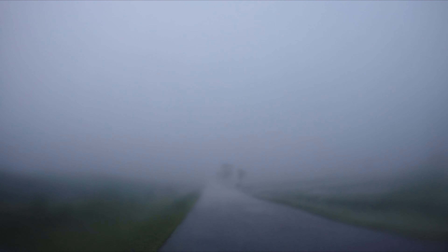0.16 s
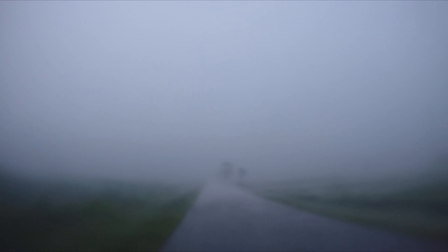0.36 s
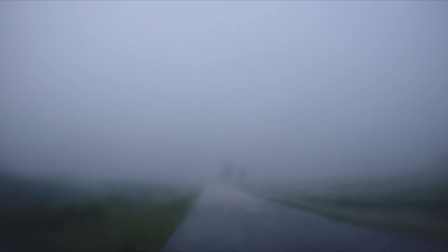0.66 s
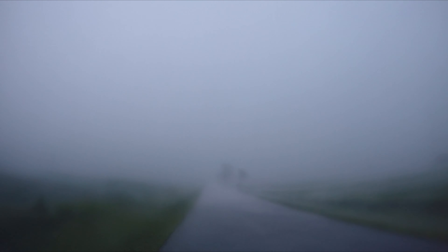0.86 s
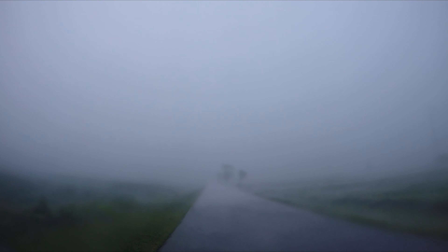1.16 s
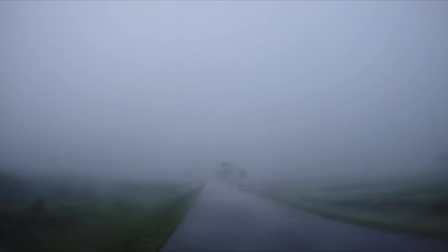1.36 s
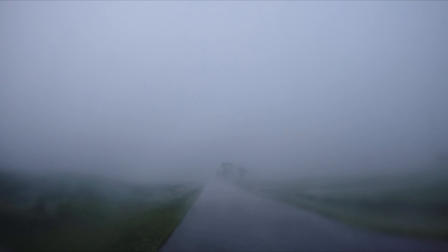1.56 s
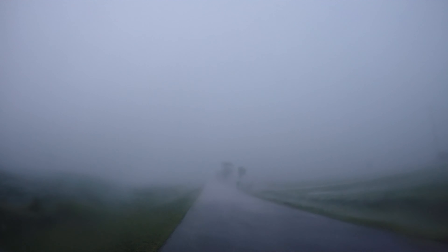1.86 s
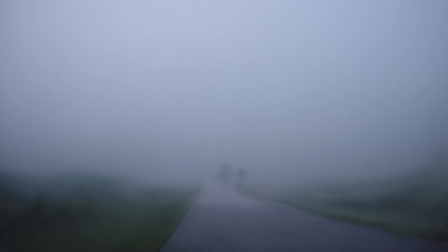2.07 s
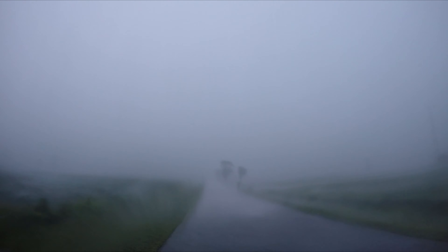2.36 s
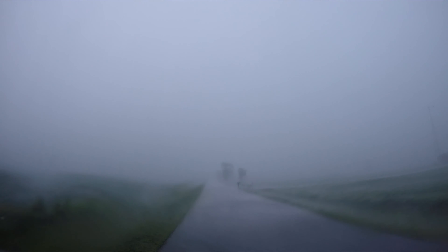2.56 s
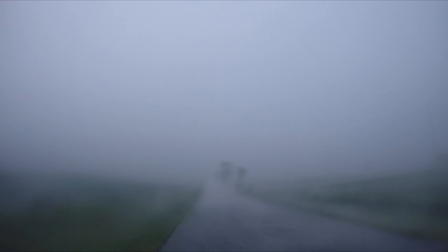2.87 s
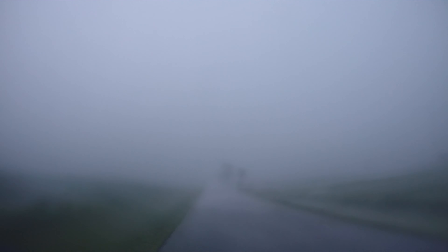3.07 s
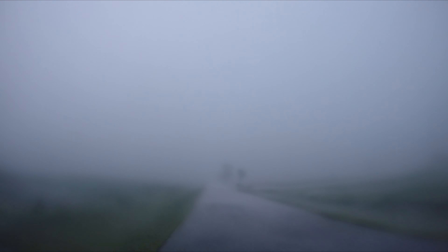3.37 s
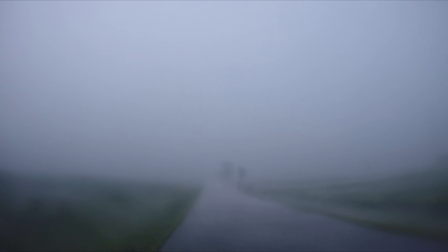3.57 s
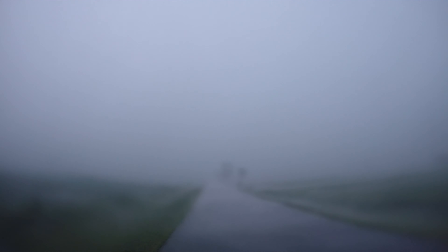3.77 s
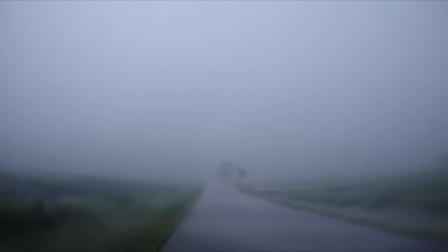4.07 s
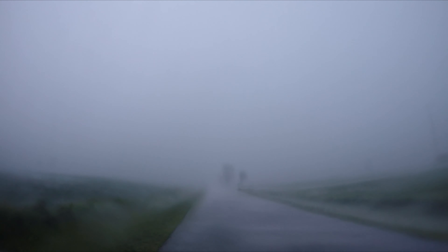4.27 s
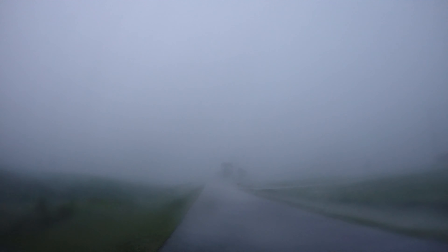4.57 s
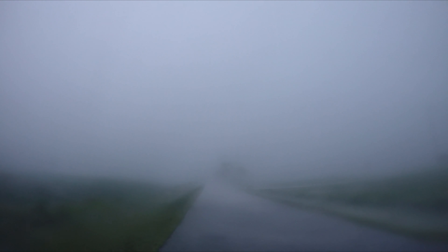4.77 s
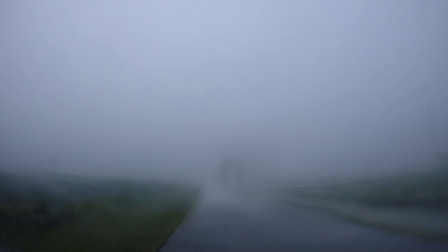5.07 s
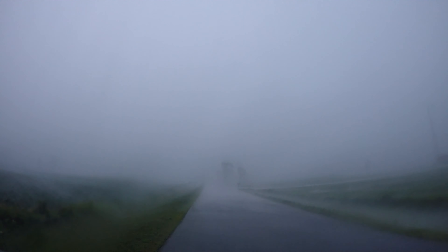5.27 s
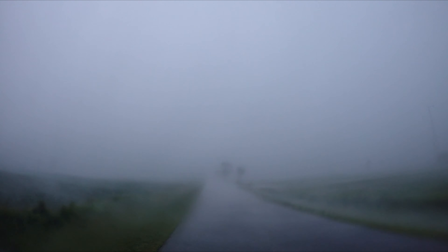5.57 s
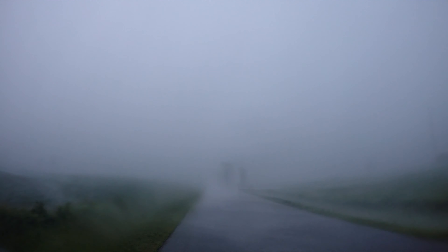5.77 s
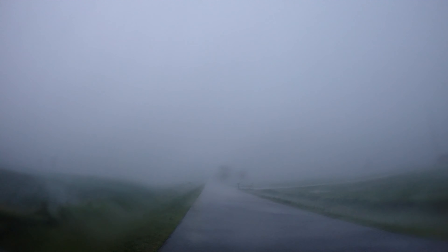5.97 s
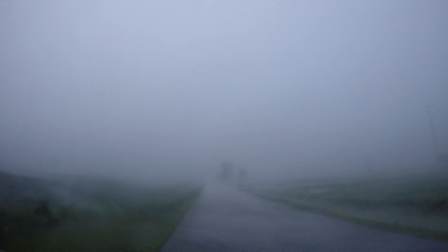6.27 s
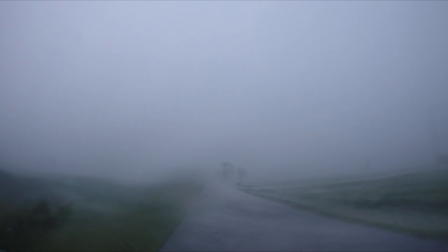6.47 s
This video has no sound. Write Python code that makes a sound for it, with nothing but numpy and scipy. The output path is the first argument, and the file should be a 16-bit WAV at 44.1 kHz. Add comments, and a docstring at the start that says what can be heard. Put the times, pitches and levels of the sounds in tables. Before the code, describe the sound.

Raindrops smack and tick sharply on a car windshield close by, over fine pattering, soft hiss and a deep wind rumble in the cabin.

```python
"""Rain on a parked car

Inside a parked car in a storm, single drops smack or tick on the windshield close to the microphone: each
one sets ringing modes going, with a low thud and a bright, noisy snap. A finer patter on the glass and
drumming and hollow knocks on the roof are struck modes too. Dense tiny bursts make the spray hiss, shaped
noise makes a smooth wash, and gusts feed noise to the cabin's low resonances, which rumble."""
import sys
import numpy as np
from scipy import signal
from scipy.fft import rfft, irfft
from scipy.io import wavfile
from scipy.ndimage import uniform_filter1d

SR = 44100
rng = np.random.default_rng(int(sys.argv[2]) if len(sys.argv) > 2 else 0)


def transcribe(signal):
    """Save signal, clipped to [-1, 1], as a 16-bit WAV file at the path in sys.argv[1]."""
    frames = np.atleast_2d(signal).T
    limited = np.clip(frames, -1, 1)
    pcm = np.round(limited * 32767).astype(np.int16)
    wavfile.write(sys.argv[1], SR, pcm)


def level_to_linear(level):
    """Convert decibel levels to linear amplitude factors, elementwise."""
    exponent = np.asarray(level, float) / 20
    return 10 ** exponent


N = 292383   # length in samples


def rms_one(x):
    """Scales to unit rms, so that a level can be set afterwards."""
    return x / np.sqrt(np.mean(x ** 2) + 1e-20)


def in_time(rows):
    """Draws each column after the time column as a curve over the samples."""
    start_s, *columns = np.transpose(rows)
    return [np.interp(np.arange(N) / SR, start_s, column) for column in columns]


def drift(rate_hz):
    """Slow random wandering of unit rms: noise smoothed by two equal poles, one point per 40 samples."""
    pole = np.exp(-80 * np.pi * rate_hz / SR)
    noise = rng.standard_normal(N // 40 + 2002)
    slow = signal.lfilter([1], [1, -2 * pole, pole * pole], noise)[2000:]   # skip the filter's start
    return np.interp(np.arange(N) / 40, np.arange(len(slow)), rms_one(slow))


def colour(x, spectrum):
    """Shapes x by a spectrum, with minimum phase so that nothing sounds early; white rms is kept."""
    pitch_hz, level_db = np.transpose(spectrum)
    grid_hz = np.linspace(1, SR / 2, 2049)
    cepstrum = irfft(np.log(level_to_linear(np.interp(np.log(grid_hz), np.log(pitch_hz), level_db))))
    # folding the cepstrum onto its first half gives minimum phase
    cepstrum[1:2048] *= 2
    cepstrum[2049:] = 0
    kernel = irfft(np.exp(rfft(cepstrum)))
    return signal.fftconvolve(x, kernel / np.sqrt(np.sum(kernel ** 2)))[:N]


def ring(force, pitch_hz, t60_s):
    """One damped mode, falling 60 dB in t60_s; a unit click leaves unit energy."""
    r = level_to_linear(-60 / (t60_s * SR))
    w = 2 * np.pi * pitch_hz / SR
    gain = np.sin(w) * np.sqrt(2 * (1 - r * r))
    return signal.lfilter([0, gain], [1, -2 * r * np.cos(w), r * r], force + 1e-18)


def splat(at, sizes, spread_s, clean):
    """Each drop pushes with a clean tick, then flattens in a burst of noise; unit energy for size 1."""
    clicks = np.bincount(at, sizes, N)[:N]
    r = np.exp(-1 / (spread_s * SR))
    fade = signal.lfilter([0, np.sqrt(1 - r * r)], [1, -r], clicks + 1e-18)
    burst = fade * rng.standard_normal(N)
    return np.sqrt(clean) * clicks + np.sqrt(1 - clean) * burst


def strike(modes, at, sizes, shares_db, spread_s, clean):
    """Deals each drop's energy to the modes; stiff panels radiate little below their lowest mode."""
    shares = level_to_linear(shares_db + np.array(modes)[:, 1])
    shares = shares / np.sqrt(np.sum(shares ** 2, axis=1, keepdims=True))
    rung = 0
    for k, (pitch_hz, _, t60_s) in enumerate(modes):
        force = splat(at, sizes * shares[:, k], spread_s, clean)
        rung = rung + (-1) ** k * ring(force, pitch_hz, t60_s)   # neighbours alternate in sign
    low_cut = signal.butter(3, 0.67 * modes[0][0], "high", fs=SR, output="sos")
    return signal.sosfilt(low_cut, rung)


def small_drops(per_s, size_db):
    """Random landing times in clumps, with many small drops and few large ones."""
    at = np.flatnonzero(rng.random(N) < per_s * level_to_linear(3.0 * drift(15)) / SR)
    return at, level_to_linear(size_db * np.minimum(rng.exponential(1, len(at)), 3.5))


# What glass and dashboard ring with; the single drops strike these modes too.
# Columns: pitch_hz, level_db (relative), t60_s
GLASS_MODES = [(1478, -2, 0.0078), (1640, 0.5, 0.01), (1830, -2.5, 0.014), (2079, -1, 0.012),
               (2300, -8, 0.038), (2630, -0.5, 0.011), (3182, -4, 0.011), (4200, -2.5, 0.0078),
               (4526, -5.5, 0.006), (4780, -2.5, 0.0082), (4950, -5, 0.0069)]
# Colour of the snap of a drop on glass. Columns: pitch_hz, level_db (relative, per Hz)
SNAP_COLOUR = [(100, -10), (300, -4.5), (520, -22), (900, -27.5), (3000, -1.5), (5500, 3.5), (6300, -3.5),
               (7000, 2.5), (8300, -7.5), (10000, -10.5), (14800, -14.5), (16000, -33)]


def patter(level_db):
    """Small drops all over the glass, each with its own mix of modes and a faint snap."""
    at, sizes = small_drops(400, size_db=9.0)
    mix_db = 8.0 * rng.standard_normal((len(at), len(GLASS_MODES)))
    glass = strike(GLASS_MODES, at, sizes, mix_db, spread_s=0.0005, clean=0.69)
    snap = colour(splat(at, sizes * level_to_linear(-9.5), spread_s=0.0004, clean=0.73), SNAP_COLOUR)
    return level_to_linear(level_db) * rms_one(glass + snap)


# The low, longer ringing modes of the roof; its knocks use them too.
# Columns: pitch_hz, level_db (relative), t60_s
ROOF_MODES = [(725, -14.5, 0.061), (846, -1, 0.064), (1056, 4.5, 0.054), (1160, -9.5, 0.072)]


def roof_drumming(level_db):
    """Duller drops overhead push slowly and reach only the low, longer ringing modes."""
    at, sizes = small_drops(600, size_db=4.5)
    mix_db = 5.9 * rng.standard_normal((len(at), len(ROOF_MODES)))
    drum = strike(ROOF_MODES, at, sizes, mix_db, spread_s=0.0029, clean=0.13)
    return level_to_linear(level_db) * rms_one(drum)


# Colour of the spray's hiss. Columns: pitch_hz, level_db (relative, per Hz)
SPRAY_COLOUR = [(88, -43.5), (150, -4), (524, -37), (675, 4.5), (1060, 0), (1310, -1), (2020, 8),
                (2700, 2.5), (3620, -3.5), (4760, 1.5), (6260, -15), (7180, -7), (13700, -13), (15100, -28),
                (16000, -49)]


def spray(level_db):
    """The finest drops burst so densely that they nearly merge into a hiss."""
    at, sizes = small_drops(700, size_db=6.0)
    bursts = splat(at, sizes, spread_s=0.0013, clean=0.1)
    return level_to_linear(level_db) * colour(rms_one(bursts), SPRAY_COLOUR)


# How loud the wash is over time. Columns: start_s, level_db
WASH_LEVEL = [(0.0, -40), (0.64, -51), (1.3, -39.5), (2.3, -45), (3.3, -47), (3.86, -45), (4.1, -37.5),
              (4.3, -34), (4.6, -37), (5.0, -43), (5.3, -56), (5.78, -46), (5.96, -43.5), (6.15, -35.5),
              (6.39, -33), (6.63, -38)]
# Its colour. Columns: pitch_hz, level_db (relative, per Hz)
WASH_SPECTRUM = [(300, -38), (560, -36), (720, -10.5), (1040, 0.5), (1280, -9.5), (1600, -4.5), (2060, 0.5),
                 (2350, -3), (2650, -5.5), (2850, -19), (3800, -20), (4900, -14), (6300, -26),
                 (15000, -30.5)]


def wash():
    """Rain on the whole body merges into smooth noise that swells slowly."""
    level_db, = in_time(WASH_LEVEL)
    noise = colour(rng.standard_normal(N), WASH_SPECTRUM)
    return level_to_linear(level_db + 0.89 * drift(8.0)) * noise


# How loud the gusts' rumble is over time. Columns: start_s, level_db
GUST_LEVEL = [(0.0, -33.5), (0.16, -39), (0.2, -43), (0.7, -41.5), (1.5, -41), (1.57, -37.5), (2.33, -41.5),
              (2.51, -37), (3.03, -40.5), (3.3, -39.5), (3.53, -41.5), (3.78, -39.5), (4.26, -36.5),
              (4.36, -31.5), (4.54, -34), (4.63, -29.5), (4.86, -37.5), (5.11, -32.5), (5.24, -45),
              (5.39, -38), (5.83, -43.5), (5.95, -40.5), (6.08, -44.5), (6.15, -36), (6.39, -32),
              (6.63, -33.5)]
# Cabin and body resonances shaken by gusts. Columns: pitch_hz, width_hz, level_db (relative, per Hz)
CABIN_MODES = [(25.5, 9.6, -7.5), (33.72, 1.5, 7.5), (57.4, 4.65, 0.5), (83, 5.2, -4), (130, 8.8, -15),
               (190, 54, -59), (306, 11.6, -20)]
EVEN_S, EVEN_SHARE = 0.16, 0.4   # chance swells are partly evened over this time (s), by this share


def wind():
    """Turbulence feeds the low resonances, each swelling on its own."""
    rumble = 0
    for pitch_hz, width_hz, mode_db in CABIN_MODES:
        t60_s = 3 * np.log(10) / (np.pi * width_hz)   # a narrower resonance rings longer
        mode = ring(rng.standard_normal(N), pitch_hz, t60_s)
        mode = rms_one(np.diff(mode, prepend=0))
        rumble = rumble + level_to_linear(mode_db + 1.8 * drift(2.1)) * np.sqrt(width_hz) * mode
    swell = uniform_filter1d(rumble ** 2, int(EVEN_S * SR)) + 1e-12
    level_db, = in_time(GUST_LEVEL)
    return level_to_linear(level_db) * rms_one(rumble / swell ** (EVEN_SHARE / 2))


# The largest middling drops stand this far (dB) over the patter; the spread (dB) sets how fast sizes fall.
MIDDLING_PER_S, MIDDLING_OVER_PATTER_DB, MIDDLING_SPREAD_DB = 25, 11, 4.5
MIDDLING_SNAP_DB, SNAP_SPREAD_DB = -7, 4   # relative to the ring
# The thud relative to the ring: weaker where the glass rings high
THUD_DB, THUD_DB_PER_OCTAVE, THUD_SPREAD_DB = -13.5, -3, 2


def middling_drops(patter_db):
    """Rows like those of the timed drops, by chance: any time, any mode, sized with the patter."""
    when, size, mode, snap, thud = rng.random((int(MIDDLING_PER_S * N / SR), 5)).T
    ring_db = patter_db[(when * N).astype(int)] + MIDDLING_OVER_PATTER_DB
    ring_db = ring_db + MIDDLING_SPREAD_DB * np.log(size + 1e-9)
    pitch_hz = np.array(GLASS_MODES)[(mode * len(GLASS_MODES)).astype(int), 0]
    # sqrt(3) * (2u - 1) is an even chance of spread 1
    snap_db = MIDDLING_SNAP_DB + SNAP_SPREAD_DB * np.sqrt(3) * (2 * snap - 1)
    octaves_up = np.log2(pitch_hz / GLASS_MODES[3][0])
    thud_db = THUD_DB + THUD_DB_PER_OCTAVE * octaves_up + THUD_SPREAD_DB * np.sqrt(3) * (2 * thud - 1)
    return np.transpose([when * N / SR, ring_db, pitch_hz, snap_db, thud_db])


# Drops at set times, from loud smacks to faint ticks. Columns: start_s, ring_db (over the first 6 ms),
# pitch_hz (strongest ring), snap_db (relative to the ring), thud_db (relative to the ring)
TIMED_DROPS = [(0.0676, -24, 2080, -15, -20), (0.0718, -19.5, 2630, -18, -13),
               (0.0769, -21.5, 1640, -18, -6.5), (0.1149, -11, 2710, -19, -23),
               (0.1332, -25, 2070, -27, -1), (0.1477, -17.5, 2270, -15, -7),
               (0.1812, -19.5, 4370, -20, -23), (0.1904, -25, 1650, -18.0, -13),
               (0.1956, -17.5, 4590, -12.5, -20), (0.2062, -45, 4980, -18, -19.0),
               (0.2174, -20.5, 4210, -11.0, -9), (0.2273, -18.5, 1480, -22.0, -9),
               (0.2402, -15, 4200, -18, -14), (0.2576, -15, 2070, -12, -14), (0.2632, -11, 2050, -32, -8.5),
               (0.2717, -22, 2380, -25, -21), (0.2769, -31, 1850, -26, -11), (0.2855, -19, 4080, -21, -21),
               (0.3088, -18.5, 4600, -10, -15), (0.3365, -24.5, 4790, -6, -12.0),
               (0.3571, -18, 1524, -19.0, -5), (0.3634, -29, 3170, -16, -6),
               (0.3822, -28.5, 2080, 3, -14.0), (0.3903, -30, 2760, -11.0, -15.0),
               (0.4083, -15.5, 1890, -9.5, -12), (0.4246, -36, 2440, -15.0, -17.0),
               (0.4288, -21.5, 2150, -25.0, -8), (0.4414, -30, 2030, -4, -6),
               (0.4704, -13.5, 1930, -18, -10), (0.4908, -25, 2570, -1, -25), (0.4973, -35, 4830, -7, -24),
               (0.5234, -24, 4930, -3, -29), (0.5312, -34, 4820, 3, -16), (0.5468, -28, 4740, -9, -14.0),
               (0.5525, -12.5, 4170, -9.5, -32), (0.5847, -17.5, 2620, -10.0, -13),
               (0.598, -30, 1520, -13.0, -2), (0.6089, -19.5, 2630, -14, -11),
               (0.6182, -21, 2150, -26, -18), (0.6397, -19.5, 2210, -20, -14), (0.6664, -25, 1480, -10, -5),
               (0.6865, -26, 2070, -13, -2), (0.6963, -23.5, 4680, -14, -13),
               (0.7152, -23.5, 1600, -18, -8), (0.7214, -28.5, 2100, -17, -15),
               (0.7408, -13, 2720, -13, -30), (0.7737, -12.5, 1925, -12, -9.5),
               (0.7918, -23, 4380, -6, -10), (0.7963, -11, 4200, -14, -9.5), (0.8704, -27, 1650, -28, -11),
               (0.8864, -26, 4790, -12, -9), (0.9202, -16.5, 1930, -30, -9.5),
               (0.9391, -20.5, 2170, -18, -13), (0.9681, -20.5, 1940, -13.5, -5.5),
               (1.0032, -31, 2050, -3, -18), (1.0221, -12, 4200, -36, -21),
               (1.0578, -23.5, 1950, -13.0, -5), (1.0782, -37, 2050, -16, -20),
               (1.0918, -32, 4200, -12, -26), (1.1095, -48, 2300, -9, -14), (1.1408, -21, 2020, -10, -9),
               (1.1432, -24, 4250, -19, -20), (1.1481, -25, 4220, -16, -16), (1.1801, -24, 4210, -11, -15),
               (1.1863, -21.5, 1830, -16, -7), (1.2279, -33.5, 1650, -18, 2),
               (1.2374, -16.5, 1610, -31, -13), (1.2456, -18.5, 2630, -16, -10),
               (1.2611, -21, 1600, -14.5, -9), (1.2745, -26, 2760, -17, -15), (1.3049, -22, 4130, -16, -18),
               (1.3151, -28, 4670, -13, -15), (1.3195, -19.5, 2210, -17.0, -30),
               (1.3694, -23, 4760, -14, -14), (1.4165, -17.5, 1930, -17.0, -13),
               (1.4427, -28.5, 2540, -2.5, -19), (1.4572, -28, 1400, -20, -5), (1.4749, -30, 5030, -1, -12),
               (1.482, -21, 2640, -19, -12), (1.4993, -29, 2080, -18, -11), (1.5358, -29, 2130, -20, -15),
               (1.5708, -40, 4270, 2, -13), (1.5753, -26, 1920, -16, -17.0),
               (1.5858, -22.5, 4910, -10, -21), (1.6171, -11.5, 2030, -20, -6.5),
               (1.6353, -34.5, 1870, -7, 10), (1.6391, -18.5, 1750, -14, -13),
               (1.7807, -17.5, 4380, -9, -25), (1.7972, -20.5, 2060, -18, -13),
               (1.8282, -18, 5000, -2.5, -13), (1.8901, -26, 3060, -24, -29),
               (1.9094, -9.5, 1890, -16.0, -15), (1.9159, -23.5, 1800, -11, 0),
               (1.9301, -14.5, 1900, -20, -12), (1.9753, -29, 2680, -14.0, -12),
               (1.9901, -27, 4460, -4, -2), (1.9989, -23, 4850, -5.5, -21), (2.0066, -28, 2260, -3, -7.0),
               (2.0123, -25, 2480, -10, -14.0), (2.0212, -24.5, 1380, -12, -9.0),
               (2.0757, -29, 2800, -21, -18), (2.085, -20, 4330, -13, -4), (2.1054, -17, 1520, -12, -7),
               (2.1128, -22.5, 1560, -15, -8), (2.1294, -20.5, 2140, -13, -8),
               (2.1604, -19.5, 4300, -9, -13), (2.174, -27, 2420, -8.0, -12), (2.189, -20, 2600, -12, -14),
               (2.2122, -11, 4200, -20, -20), (2.2155, -25, 1860, -29, 0), (2.2711, -29.0, 2210, -22, -1),
               (2.284, -22, 1470, -29, -6), (2.33, -21, 2030, -37, -7), (2.3684, -21.5, 2700, -10, -11),
               (2.3805, -38, 3250, -17, -10), (2.3855, -24, 2650, -7.5, -5), (2.4295, -28, 4200, -7, -22),
               (2.4877, -23, 2710, -7.5, -16), (2.5244, -19, 4200, -30, -37), (2.5361, -26, 1820, -6, -9),
               (2.5707, -12.5, 1610, -13, -13), (2.5942, -13.5, 2016, -10, -23),
               (2.6051, -26, 4100, -7, -19.0), (2.6324, -26, 1970, -5.5, -9), (2.7033, -16, 4190, -13, -30),
               (2.7362, -26, 1900, -14.0, -1), (2.7419, -28, 2010, -24, -20),
               (2.7555, -18.5, 2630, -3.5, -21), (2.8265, -34, 1830, -23, -19),
               (2.8324, -17, 4200, -15, -21), (2.8403, -10.5, 2600, -14, -31),
               (2.8493, -26, 4550, -0.5, -11), (2.8546, -17.5, 1530, -21, -15),
               (2.8761, -22.5, 2760, -10, -29.0), (2.8821, -17.5, 2030, -26, -13),
               (2.8912, -18.5, 1510, -22, -9.5), (2.9008, -18, 4800, -5, -11), (2.906, -19, 1660, -26, -2),
               (2.9198, -21, 2090, -16.0, -12), (2.9236, -19.5, 1970, -1.5, -18),
               (2.944, -31, 1750, -8, -15), (2.95, -33, 4900, -1, -24.0), (2.9555, -15, 4330, -11, -25),
               (2.9869, -21, 2030, -15, -4.5), (3.0452, -19.5, 2610, -19.0, -10),
               (3.0561, -31, 1710, -28.0, -2), (3.0601, -28, 1770, -15, -2),
               (3.0788, -27, 2050, -10.0, -18), (3.0873, -11, 4900, -14, -18),
               (3.0906, -15.5, 2185, -8.5, -21), (3.1154, -25, 4920, -6, -19),
               (3.1193, -29, 2060, -8, -18.0), (3.1465, -17.5, 4200, -7, -32), (3.1508, -20, 1900, -7, -10),
               (3.1583, -20.5, 1820, -20, -10), (3.1691, -27, 2020, -19, -18), (3.1832, -23, 4280, -9, -15),
               (3.1912, -29, 2450, -13, -4), (3.1991, -30, 4200, -20, -31), (3.2206, -29, 4200, -6, -22),
               (3.2506, -27, 2110, -21, -1), (3.2548, -26, 1550, -5, -14), (3.274, -15.0, 2700, -16, -11),
               (3.2897, -25.0, 3210, -20.0, -8), (3.3115, -29, 4500, -8, -7),
               (3.3177, -31, 4330, -14, -26.0), (3.3222, -28, 2080, -4, -2), (3.3325, -30, 4870, 6.5, -10),
               (3.3381, -30, 4780, 3, -23), (3.3417, -42, 5080, -1, -9), (3.3473, -30, 2100, -11.0, -5),
               (3.3566, -26, 2080, -12, -11), (3.362, -32, 4930, -5.0, -1),
               (3.3683, -23.5, 1930, -18.0, -6.5), (3.3738, -24, 1760, -24, -14),
               (3.3817, -25, 2270, -10, -20), (3.3906, -29, 2200, -12.0, -2),
               (3.3988, -25, 2300, -17, -13.0), (3.4046, -17.5, 1830, -11, -9),
               (3.4134, -24, 2270, -11, -23), (3.4265, -20, 1640, -30, -8.5),
               (3.4489, -33, 2090, -1.0, -12), (3.4672, -18, 2060, -21, -9),
               (3.5126, -16, 4170, -26, -11.5), (3.5202, -25, 2050, -2.5, -23),
               (3.5316, -18.5, 4200, -17.0, -19), (3.5407, -23, 1990, -14, -13.0),
               (3.567, -32, 1930, -20, -19), (3.6344, -19.5, 2330, -12, -12),
               (3.6483, -20.5, 2590, -13, -9), (3.6672, -11.5, 4200, -21, -31),
               (3.6998, -20, 2050, -18.0, -19), (3.7113, -15.5, 1600, -7.5, -9),
               (3.7316, -12, 2010, -20, -13.5), (3.7546, -30, 1880, -15.0, -1),
               (3.7763, -42, 4110, -12, -9), (3.7943, -21.5, 4200, -2.5, -25),
               (3.7959, -20, 4200, -24, -7.5), (3.8104, -25, 4200, -12, -8.0), (3.8177, -30, 1830, -15, 1),
               (3.8295, -26, 2050, -17, -14), (3.8413, -28.5, 1730, -8, -4),
               (3.8563, -31.5, 2400, -8, -22.0), (3.8863, -33, 2020, -14, 0), (3.9596, -44, 2120, 0, -12),
               (4.0206, -27, 1500, -8.5, -14), (4.0463, -21, 1710, -16, -16), (4.0849, -36, 2060, -3.5, 4),
               (4.1993, -30.5, 5000, -19, -23), (4.2037, -31, 1970, -14, -5),
               (4.2187, -22, 2040, -26, -11.0), (4.2486, -38, 1650, -26, -16), (4.3063, -30, 4830, 1, 0),
               (4.3504, -29, 2150, -19.0, -28.0), (4.3556, -24, 1930, -9, -18),
               (4.3682, -13.5, 2450, -9.5, -26), (4.3835, -25.5, 4760, 1, -26),
               (4.3953, -19, 2040, -17, -2), (4.4105, -20, 1630, -17, -11), (4.4141, -27, 4700, 0, -10),
               (4.4193, -26, 1950, -19, -2), (4.4593, -14, 4660, -14, -8), (4.4716, -29.5, 4400, -1, -15.0),
               (4.4859, -30, 1530, -19, -16), (4.4985, -31.0, 2100, 1, 3.5), (4.5244, -22, 4970, -14, -13),
               (4.5369, -24, 4120, -15, -28.0), (4.5541, -15.5, 2120, -13.5, -13),
               (4.5644, -24, 2060, -10, -5), (4.5731, -33, 3100, -15, 1), (4.6012, -15, 4870, -1, -28),
               (4.6096, -21.5, 1920, -32, -1), (4.6204, -15, 4240, -22, -9),
               (4.6347, -15.5, 1830, -7, -4.5), (4.6658, -20.5, 2160, -9, -22),
               (4.6765, -21, 1690, -15.0, -8), (4.7016, -25, 2350, -12, -14), (4.7216, -26, 2650, -2, -2),
               (4.7377, -27, 4330, 1, -22), (4.7642, -16.5, 4530, -9.5, -14), (4.7753, -24, 4480, -9, -5),
               (4.7868, -24.0, 4610, -12, -13.0), (4.7924, -22, 1800, -4, -6), (4.8116, -23, 1900, -4, -21),
               (4.844, -18.5, 4400, -10, -22), (4.8505, -21.5, 4610, -8, -23),
               (4.8577, -27.0, 2110, -21, -27.0), (4.8677, -32, 2430, -14, -14),
               (4.8765, -30.0, 2120, -9, -14), (4.8946, -17, 4670, -1.5, -22),
               (4.9048, -34, 2030, -9, -21.0), (4.9117, -27, 4530, -8, -4), (4.9166, -27, 4750, -7, -27.0),
               (4.9415, -10.5, 2230, -14.5, -8.5), (4.9475, -21, 4400, -11, 2),
               (4.9575, -23, 2070, -24.0, -17), (4.98, -20, 3480, -9, -2.0),
               (5.0049, -32, 2030, -16, -12.0), (5.0107, -23.5, 2010, -23, -6),
               (5.029, -26, 1930, -18, -18.0), (5.0732, -37, 4330, 5, -1), (5.0907, -18, 2070, -11, -6),
               (5.1112, -26, 4710, -6, -3), (5.1163, -20, 3220, -8, -10), (5.13, -20, 1595, -10, -6),
               (5.151, -22, 4770, -9.0, -2.5), (5.1606, -6.5, 2630, -4, -24), (5.1978, -41, 4800, -6, -20),
               (5.2105, -37, 1640, -4, -10), (5.2272, -32, 4660, -12, -12), (5.235, -29, 1710, -8, -14),
               (5.2456, -28, 1960, -13, -9), (5.2636, -35, 4200, -9, -22), (5.321, -36, 2010, -4, -16),
               (5.3308, -30, 2030, -13, -10), (5.3507, -17, 2205, -10, -26), (5.3846, -22, 2000, -8.5, -12),
               (5.4667, -45, 4750, -5, -21), (5.4813, -30, 1400, -18, -9), (5.4855, -23.5, 1950, -11, -7),
               (5.5244, -26.5, 2110, -12, -10), (5.5359, -24.5, 4850, -14, -20),
               (5.5711, -26, 4200, -8, -11), (5.6093, -33, 1900, -12, -12), (5.6214, -23.5, 4230, -1, -9),
               (5.6337, -22.5, 1930, -11, -5), (5.6513, -24, 1820, -8.5, -6),
               (5.72, -23.5, 2110, -12, -6.5), (5.7878, -30.5, 4370, -6.5, -20),
               (5.8691, -46, 4200, -17, -20), (5.898, -31.5, 2030, -14, -6), (5.913, -46, 4700, -7, -18),
               (6.0625, -33, 2050, -8, -22), (6.1175, -38.5, 4200, -15, -16), (6.1967, -28, 2400, -18, -9),
               (6.206, -34, 4800, 1, -18), (6.2336, -23, 1680, -11, -4), (6.2673, -21.5, 1680, -21, -13.0),
               (6.2798, -29.5, 2570, -12, -11), (6.3265, -35, 4200, -12, -14),
               (6.3833, -26.5, 1590, -21, -12), (6.4296, -8, 1875, -22, -10),
               (6.4549, -21, 1740, -10.0, -13.0), (6.466, -35, 4700, -2, -14),
               (6.4761, -13.5, 1830, -13, -11), (6.4998, -12, 1670, -35, -22), (6.512, -20, 4380, -14, -7),
               (6.5311, -22, 4200, -22, -17), (6.5524, -28, 1690, -19, -6.0), (6.563, -19, 1640, -15, -10),
               (6.5756, -14, 2750, -24.0, -21), (6.5865, -19.5, 1930, -5, -1)]
# Low panel modes under a drop. Columns: pitch_hz, level_db (relative), t60_s
THUD_MODES = [(693, -14, 0.0071), (894, -3, 0.0051), (1112, 0, 0.01)]
RING_S = 0.006   # the time over which a drop's ring level counts
# A stiff spot thuds little and rings clearly on one mode: that mode's lead (dB), and its gain per dB less thud
CLEAR_DB, CLEAR_PER_THUD = 10.5, 0.6
FIZZ_DB, FIZZ_HZ = -4.5, 8840   # the brightest part of a snap: level re snap, lower edge


def single_drops(patter_db):
    """Where a drop lands decides which mode rings most, and how clearly; the rest are struck by chance."""
    rows = np.vstack([TIMED_DROPS, middling_drops(patter_db)])
    start_s, ring_db, pitch_hz, snap_db, thud_db = np.transpose(rows)
    at = (start_s * SR).astype(int)
    sizes = level_to_linear(ring_db) * np.sqrt(RING_S * SR)
    glass_luck = rng.standard_normal((len(at), len(GLASS_MODES)))
    thud_luck = rng.standard_normal((len(at), len(THUD_MODES)))
    fizz_luck = rng.standard_normal(len(at))
    clear_luck = rng.standard_normal((len(at), 1))

    octaves_off = np.log2(pitch_hz[:, None] / np.array(GLASS_MODES)[:, 0])
    clearly_db = CLEAR_DB - CLEAR_PER_THUD * (thud_db[:, None] - THUD_DB) + 2.0 * clear_luck
    clearly_db = np.clip(clearly_db, 3, 24)
    favoured_db = clearly_db * np.exp(-(octaves_off / 0.053) ** 2) - 2.23 * np.abs(octaves_off)
    glass = strike(GLASS_MODES, at, sizes, favoured_db + 3.13 * glass_luck, spread_s=0.00061, clean=0.83)

    thud = strike(THUD_MODES, at, sizes * level_to_linear(thud_db), 3.2 * thud_luck, spread_s=0.00034, clean=0.92)
    snap = colour(splat(at, sizes * level_to_linear(snap_db), spread_s=0.00081, clean=0.44), SNAP_COLOUR)
    # the fizz differs in level from drop to drop
    fizz_sizes = sizes * level_to_linear(snap_db + FIZZ_DB + 3.1 * fizz_luck)
    fizz = splat(at, fizz_sizes, spread_s=0.0004, clean=0.31)
    fizz_band = signal.butter(2, [FIZZ_HZ, 15000], "band", fs=SR, output="sos")
    return glass + thud - snap + signal.sosfilt(fizz_band, fizz)


# Single heavy drops on the roof. Columns: start_s, level_db (peak)
ROOF_KNOCKS = [(0.125, -26), (1.6751, -26), (3.234, -30), (3.8845, -30), (4.0748, -21.5), (4.2288, -37),
               (4.3, -40), (4.4394, -45), (4.765, -24), (6.2494, -32), (6.3093, -31), (6.3842, -28)]
KNOCK_S = 0.0023   # a knock holds its peak about this long


def roof_knocks():
    """Each heavy drop strikes all the roof modes with a slow, noisy push: a hollow knock."""
    start_s, level_db = np.transpose(ROOF_KNOCKS)
    at = (start_s * SR).astype(int)
    sizes = level_to_linear(level_db) * np.sqrt(KNOCK_S * SR)
    even_db = np.zeros((len(at), len(ROOF_MODES)))
    return strike(ROOF_MODES, at, sizes, even_db, spread_s=0.0061, clean=0.2)


# The storm's levels over time. Columns: start_s, patter_db, drumming_db (roof), spray_db
STORM_LEVELS = [(0.0, -30, -46, -61), (0.33, -41, -48, -37.5), (0.64, -35.5, -42, -34.5),
                (0.94, -48.5, -48, -37.5), (2.12, -39, -45.5, -45), (2.38, -45.5, -46, -43.5),
                (3.12, -38.5, -43.5, -43), (3.33, -33, -48, -30.5), (3.45, -43.5, -43, -39.5),
                (3.8, -35, -45, -34), (3.88, -46, -55, -39.5), (4.0, -56, -48, -45), (4.3, -49, -43, -45),
                (4.54, -46, -34, -38.5), (4.97, -36.5, -48.5, -33), (5.32, -47, -43, -41.5),
                (5.96, -46, -62.5, -46.5), (6.38, -49, -39, -46), (6.63, -32, -44, -36)]


def scene():
    """All sources meet at one microphone."""
    patter_db, drumming_db, spray_db = in_time(STORM_LEVELS)
    fine_rain = patter(patter_db) + roof_drumming(drumming_db) + spray(spray_db) + wash()
    rumble = wind()
    separate_drops = single_drops(patter_db) + roof_knocks()
    return (fine_rain + rumble + separate_drops)[None]


def top_cut(x):
    """Nothing passes above the cut-off."""
    return signal.sosfilt(signal.butter(12, 16500, fs=SR, output="sos"), x)


OVERLOAD_DB, KNEE = -6, 5   # where the input stage flattens (dB), and how sharply
CUTOFF_HZ = 16740   # from here up the treble is cut by at least 60 dB


def record(dry):
    """The input stage flattens the peaks, then the top is cut."""
    held = dry / (1 + np.abs(dry / level_to_linear(OVERLOAD_DB)) ** KNEE) ** (1 / KNEE)
    mix = signal.sosfilt(signal.cheby2(10, 60, CUTOFF_HZ, fs=SR, output="sos"), held)
    return top_cut(mix)


dry = scene()
out = record(dry)
transcribe(out)
```